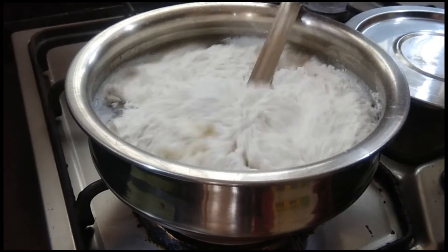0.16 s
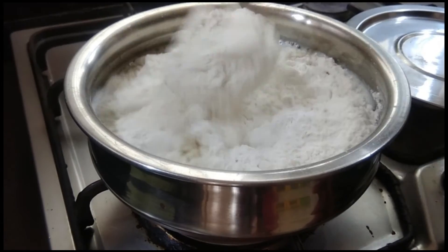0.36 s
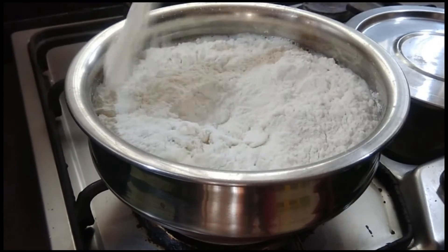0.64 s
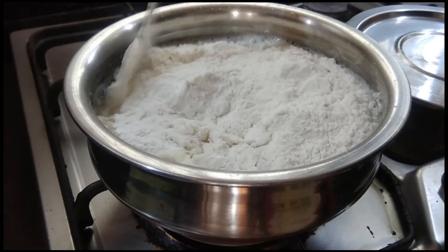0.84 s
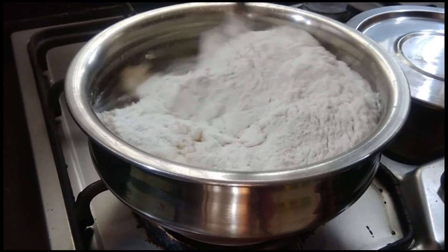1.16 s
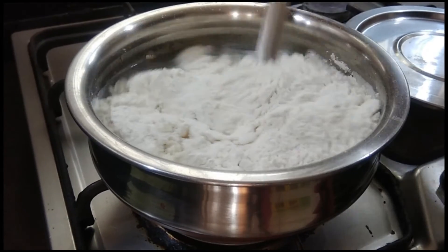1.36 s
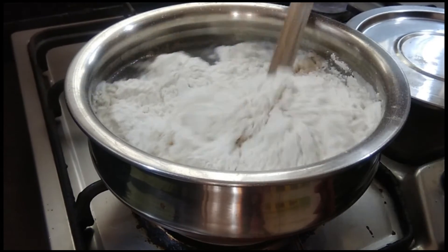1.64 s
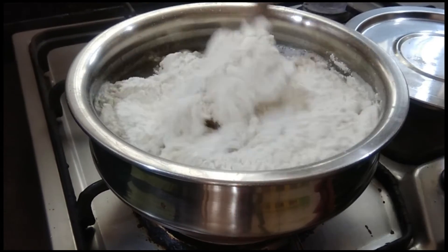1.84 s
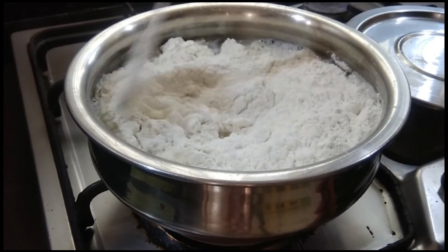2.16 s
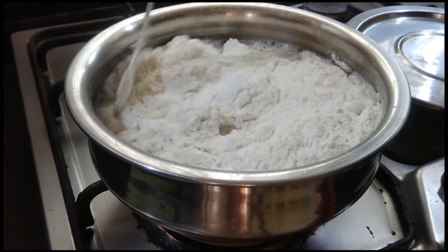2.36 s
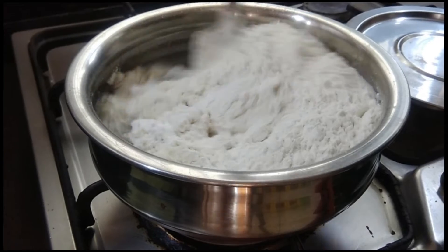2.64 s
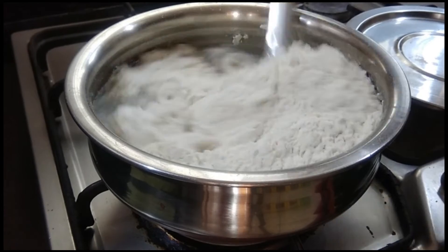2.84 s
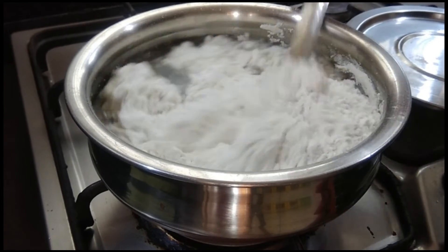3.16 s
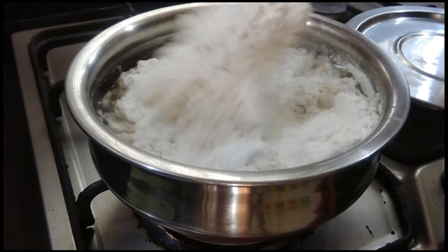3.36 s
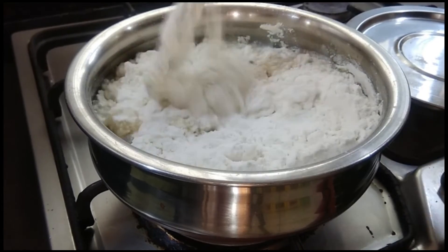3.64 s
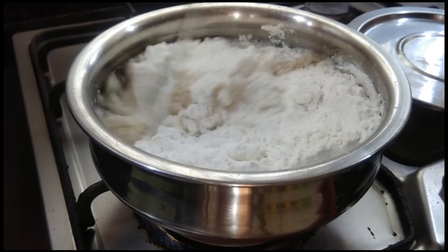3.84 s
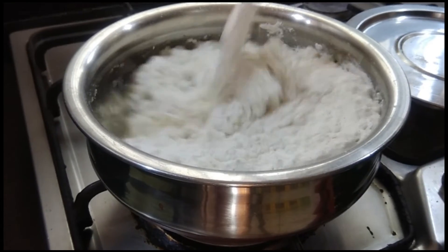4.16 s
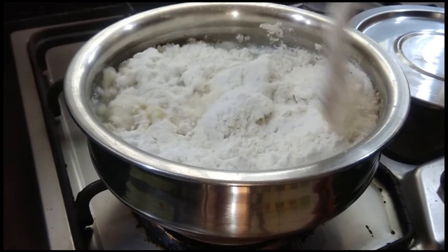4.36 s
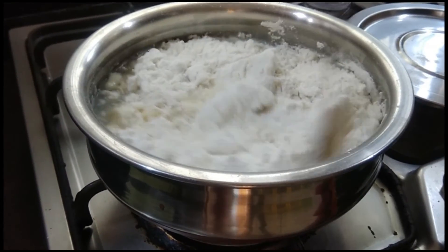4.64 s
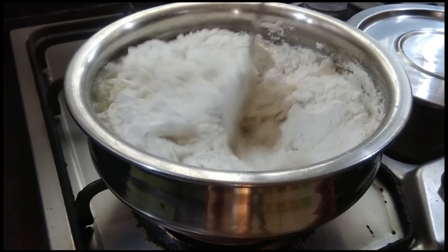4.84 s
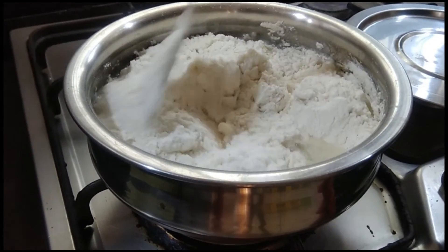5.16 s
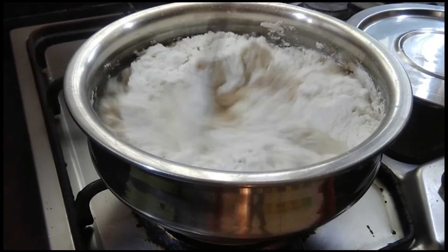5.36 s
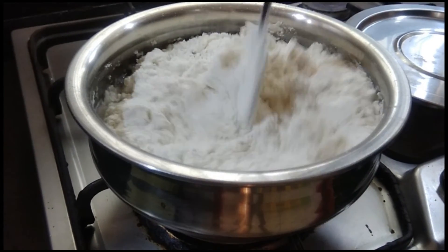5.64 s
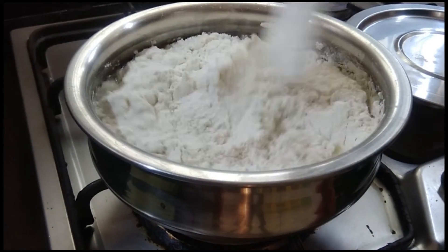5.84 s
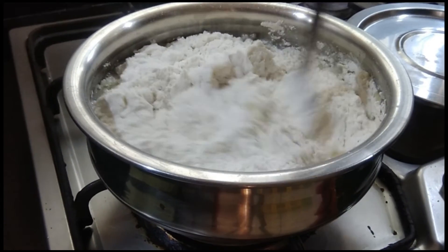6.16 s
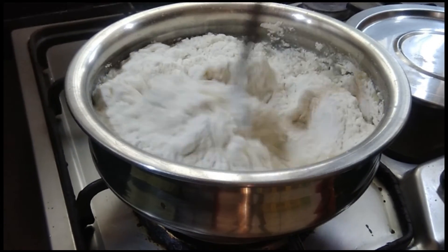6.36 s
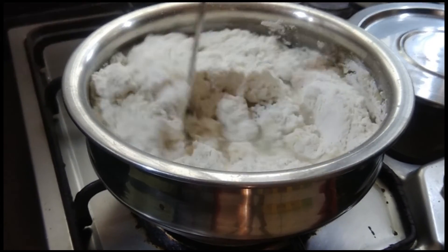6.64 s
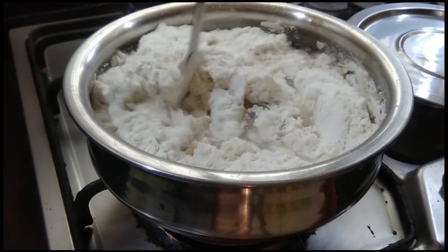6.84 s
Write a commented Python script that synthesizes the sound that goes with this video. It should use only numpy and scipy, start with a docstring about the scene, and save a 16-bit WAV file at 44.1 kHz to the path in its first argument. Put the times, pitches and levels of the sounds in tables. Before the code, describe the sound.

Close microphone in a quiet kitchen. A steel spatula scrapes wet flour around a pot in uneven gritty hisses, its edge singing faintly on the metal. Dull, dough-muffled knocks land at about 0.9, 2.3, 4.6 and 6.1 seconds, with crushed lumps spurting hiss and small bright ticks on the wall. Beneath run a soft burner rush, hollow simmer, little bubbles and a very thin high whine.

```python
"""Quiet kitchen, steel pot on a stove, microphone close: burner rush, simmer and a thin whine throughout.
From the start a steel spatula drags gritty hiss through wet flour (filtered grains and noise) and its
edge sings on steel (narrow noise); bubbles (rising tones), steam gurgles and hollow spatula notes (noise
swells) join. Then come knocks on the pot, muffled by dough (push, ring and slap), and lumps crushed in
spurts of hiss; last to enter are blade ticks on the wall (click and high ring). A short room tail follows."""
import sys
import numpy as np
from scipy import signal
from scipy.fft import rfft, irfft, next_fast_len
from scipy.io import wavfile
from scipy.ndimage import uniform_filter1d

SR = 44100
rng = np.random.default_rng(int(sys.argv[2]) if len(sys.argv) > 2 else 0)


def dump(signal):
    """Clip the signal to [-1, 1] and save it as 16-bit WAV at the path in sys.argv[1]."""
    limited = np.clip(np.atleast_2d(signal).T, -1, 1)
    pcm = np.round(limited * 32767).astype(np.int16)
    wavfile.write(sys.argv[1], SR, pcm)


N = 308435
TIME = np.arange(N) / SR
CUT_HZ = 15800  # top of the recorder's band


def amp(db):
    """Amplitude from dB."""
    return 10 ** (np.asarray(db) / 20)


def unit(x):
    """Scales to rms 1."""
    return x / np.sqrt(np.mean(x ** 2) + 1e-20)


def read(points, hz):
    """A table's value on a log-frequency axis."""
    f, value = np.transpose(points)
    return np.interp(np.log(hz + 1), np.log(f + 1), value)


def add(mix, s, sound):
    """Mixes a sound in at time s."""
    part = mix[:, max(round(s * SR), 0):][:, :sound.shape[-1]]
    part += sound[..., :part.shape[1]]


def colour(x, gain):
    """Filters by a gain given as a function of Hz."""
    size = next_fast_len(x.shape[-1])
    return irfft(rfft(x, size) * gain(np.fft.rfftfreq(size, 1 / SR)), size)[..., :x.shape[-1]]


# how alike the two microphone ports hear noise: [f/Hz, left-right likeness 0-1]
LIKENESS = [(200, 0.97), (600, 0.38), (1500, 0.044), (10000, 0.039)]


def noise(size):
    """White noise at two microphone ports, alike in the bass."""
    def alike(f):
        return np.clip(read(LIKENESS, f), 0, 1)

    shared = colour(rng.standard_normal(size), lambda f: np.sqrt(alike(f)))
    separate = colour(rng.standard_normal((2, size)), lambda f: np.sqrt(1 - alike(f)))
    return shared + separate


def peak(f, hz, width):
    """Gain of a resonance, halved at half its width to either side."""
    return 1 / (1 + (2 * (f - hz) / width) ** 2)


def swell(t, length):
    """Rises to 1 in a quarter of its length, then dies away."""
    u = 4 * t / length
    return u * np.exp(1 - u)


def patches(shape, order, size):
    """A random field, smooth over order bins and size frames."""
    across = uniform_filter1d(rng.standard_normal(shape), order, axis=0)
    return unit(uniform_filter1d(across, size, axis=1))


# spectrum of the stove and kitchen: [f/Hz, relative level/dB per Hz]
FLOOR_SPECTRUM = [(25, -49), (70, -30), (130, -8.5), (219, -15), (414, -16.5), (554, -16.5), (1510, -25),
                  (2860, -29.5), (6000, -34), (8240, -31), (14000, -29)]


def stove(rush_db=-73.5, simmer_db=-81, hollow_db=-82, surge_db=6, whine_db=-68, whine_hz=15146):
    """The burner's soft rush, the pot's hollow simmer that comes and goes, and a thin steady whine."""
    rush = amp(rush_db) * unit(colour(noise(N), lambda f: amp(read(FLOOR_SPECTRUM, f))))
    simmer = 0
    for hz, db in ((224, simmer_db), (553, hollow_db)):
        surge = rng.uniform(-1, 1, size=60)
        surge = np.interp(TIME, np.linspace(0, TIME[-1], len(surge)), surge)
        band = unit(colour(noise(N), lambda f: peak(f, hz, 20.44)))
        simmer += amp(db + surge_db * surge) * band
    # a narrow core with a weaker skirt
    whine = colour(noise(N), lambda f: peak(f, whine_hz, 10) + .15 * peak(f, whine_hz, 300))
    return rush + simmer + amp(whine_db) * unit(whine)


def grit(per_s, share):
    """Countless tiny slips: separate random grains, by their share of the power, among smooth noise."""
    struck = rng.random(N) < per_s / SR
    grains = struck * (rng.standard_normal(N) * .5 + rng.standard_normal((2, N)))
    return np.sqrt(share) * unit(grains) + np.sqrt(1 - share) * noise(N)


def pressure(t, rise, hold, fade):
    """Gain of one push, t seconds after it starts: builds, eases off while held, lifts away."""
    build_db = 8.5 + 40.5 * rise  # the longer the rise, the deeper it starts
    build = build_db * np.clip(1 - t / rise, 0, 1)
    ease = 39.5 * np.clip(t - rise, 0, hold)  # dB per s
    lift = np.clip(1 - (t - rise - hold) / fade, 0, 1) ** 2
    touch = np.clip(t / (0.014 * rise), 0, 1)  # the blade makes contact early in the rise
    return touch * amp(-build - ease) * lift


def low_edge(t, low_hz=400, hz_per_db=47, hz_per_s=2780, top_hz=1690):
    """Lowest Hz of the rasp: a hard knock sets the blade on the floor, then the edge climbs as it leaves."""
    edges = []
    for s, *_, clack_db in KNOCK_EVENTS:
        climb = low_hz - hz_per_db * clack_db + hz_per_s * (t - s)
        edges.append(np.where(t > s - .005, climb, np.inf))
    return np.minimum(np.min(edges, axis=0), top_hz)


# spectrum of wet flour on steel: [f/Hz, relative level/dB per Hz]
HISS_SPECTRUM = [(1450, -13), (1850, -5), (2190, -9), (2440, -10), (3350, -16), (4300, -3.5), (6830, -2),
                 (7610, 1), (12100, 3.5), (14300, -1.5), (16000, -3.5)]
# pushes of the blade through the flour, levels before the trims below:
# [t/s, rise/s, hold/s, fade/s, fine hiss level/dB, rustle level/dB and low rasp level/dB relative
# to the hiss, brightness of the hiss/dB per octave]
PUSH_EVENTS = [(0.0, 0.0012, 0.0024, 0.062, -31, -13, -12.5, -1),
               (0.02, 0.012, 0.034, 0.26, -48, -14, -9, 3),
               (0.205, 0.03, 0.42, 0.5, -48.5, -16.5, -21, 7.5),
               (0.864, 0.14, 0.15, 0.33, -27.5, -7.5, -10, -0.5),
               (1.262, 0.11, 0.09, 0.15, -37.5, -8, -18, -0.5),
               (1.815, 0.089, 0.046, 0.15, -55.5, -4.5, -39, 7.5),
               (2.324, 0.004, 0.042, 0.075, -44.5, -10, -4, -14),
               (2.374, 0.041, 0.15, 0.15, -32.5, -8.5, -10.5, -6),
               (2.48, 0.13, 0.14, 0.38, -31, -9.5, -18, -1),
               (2.78, 0.089, 0.11, 0.048, -39.5, -6.5, -29.5, 0),
               (4.263, 0.063, 0.024, 0.089, -45, -23, -35, 13),
               (4.6, 0.0042, 0.012, 0.03, -33.5, -4.5, -7.5, -13),
               (4.692, .13, 0.042, 0.093, -43.5, -9.5, -22, 5),
               (5.38, 0.076, 0.022, 0.028, -41, -7.5, -12.5, -10.5),
               (6.077, 0.071, 0.24, 0.11, -36, -2, -2.5, -6.5),
               (6.578, 0.29, 0.1, .1, -37.5, -10, -10.5, -2.5)]


def strokes(fine_db=-3.5, rustle_db=-7.0, rasp_db=-5.0, patchy_db=3.5, judder_db=1.0, quiet_below_db=-34,
            ripple_db=3.0, quiet_ripple_db=7.0):
    """Wet flour dragged over hot steel: a fine hiss above a rustle and a low rasp."""
    f, t, z = signal.stft(grit(per_s=5000, share=0.4), SR, nperseg=512, noverlap=432)
    upper = 1 / (1 + (6900 / (f + 1)) ** 20)
    lower = 1 / (1 + (f / 3500) ** 10)
    bands = (upper * (f < CUT_HZ), (1 - upper) * (1 - lower), lower)
    fine, rustle, rasp = (unit(amp(read(HISS_SPECTRUM, f)) * band)[:, None] for band in bands)
    octaves = np.log2((f[:, None] + 1) / 11000)  # brightness pivots on 11 kHz
    power, force = 0, 0
    for s, rise, hold, fade, db, middle_db, low_db, bright_db in PUSH_EVENTS:
        push = amp(db) * pressure(t - s, rise, hold, fade)
        timbre = amp(fine_db) * unit(fine * amp(bright_db * octaves))
        timbre = timbre + amp(rustle_db + middle_db) * rustle + amp(rasp_db + low_db) * rasp
        power += push ** 2 * timbre ** 2
        force += push
    field = np.sqrt(power / (1 + low_edge(t) ** 10 / (f[:, None] + 1) ** 10))
    # random narrow ripple over the hiss, drifting with time,
    # deeper where the hiss is quiet and in its lower bands
    quiet = np.clip((quiet_below_db - 20 * np.log10(force + 1e-9)) / 10, 0, 1)
    deepening = np.maximum(quiet, 1 - upper[:, None])
    depth_db = ripple_db + (quiet_ripple_db - ripple_db) * deepening
    ripple = amp(depth_db * np.minimum(patches(field.shape, order=2, size=90), 1))
    ripple /= np.sqrt(np.mean(ripple ** 2, axis=0))
    judder = unit(uniform_filter1d(rng.standard_normal(len(t)), size=7))
    patchy = patches(field.shape, order=2, size=16)
    z = z * field * ripple * amp(patchy_db * patchy + judder_db * judder)
    sound = signal.istft(z, SR, nperseg=512, noverlap=432)[1][:, :N]
    return sound * amp([[-.6], [.6]])  # slightly to the right


# the blade's edge slides lightly on steel, each on one resonance:
# [t/s, length before release/s, f/Hz, width before bending/Hz, level before the envelope/dB]
SLIDE_EVENTS = [(0.0, 0.43, 4000, 380, -66.5), (0.0, 0.32, 3040, 900, -70), (0.392, 0.26, 1790, 128, -76.5),
                (1.848, 0.13, 6940, 1200, -60), (2.226, .06, 9260, 110, -70), (3.214, 0.14, 8050, 111, -72),
                (3.28, 0.56, 2805, 100, -70.5), (3.311, .51, 3790, 220, -74.5),
                (5.644, .1, 9370, 450, -56.5), (5.628, 0.41, 4064, 179, -70.5),
                (5.716, 0.314, 2880, 317, -70.5), (5.784, 0.3, 2266, 112, -69.5),
                (6.517, .11, 1760, 110, -67.5)]


def slides(attack_share=0.32, release_t60=0.21, waver_db=3.0, flutter_db=2.2, bend_share=0.012,
           scuff_db=-11):
    """A light rub keeps a blade resonance singing; it bends and wavers as the contact point travels."""
    out, t = np.zeros((2, N)), np.arange(SR * 3 // 4) / SR
    for s, length, hz, width, db in SLIDE_EVENTS:
        bend, waver = patches((2, len(t)), order=1, size=2400)
        flutter = patches((1, len(t)), order=1, size=350)
        rub = noise(len(t))
        line = signal.hilbert(colour(rub, lambda f: peak(f, hz, width)))
        bend_phase = 2 * np.pi * np.cumsum(bend_share * hz * bend) / SR
        line = unit((line * np.exp(1j * bend_phase)).real)
        scuff = amp(scuff_db) * unit(colour(rub, lambda f: peak(f, hz, hz / 2) ** 2))
        attack = np.minimum(t / (attack_share * length), 1)
        release = amp(-60 * np.maximum(t - length, 0) / release_t60)
        song = unit((line + scuff) * amp(waver_db * waver + flutter_db * flutter))
        add(out, s, amp(db) * song * attack * release)
    return out


def blips(per_s=6.2, top_db=-70, range_db=11, low_hz=210, high_hz=600, length=0.0634, glide=0.1):
    """Small bubbles break through the paste at random, each rising a little in pitch."""
    out, t = np.zeros((2, N)), np.arange(SR // 4) / SR
    for when, pitch, size in rng.random((int(per_s * N / SR), 3)):
        hz = low_hz * (high_hz / low_hz) ** (pitch ** 2) * (1 + glide * t / length)
        tone = np.sin(2 * np.pi * np.cumsum(hz) / SR)
        add(out, when * N / SR, amp(top_db + range_db * (size - 1)) * swell(t, length) * tone)
    return out


# steam gurgles, and hollow notes of the spatula near 800 Hz: [t/s, f/Hz, level/dB, length/s]
LOW_SWELL_EVENTS = [(0.334, 560, -63.5, 0.18), (0.45, 578, -60, 0.11), (0.921, 805, -48.5, 0.14),
                    (1.824, 282, -68.5, 0.1), (2.403, 794, -43, 0.17), (2.516, 1480, -49, 0.071),
                    (3.215, 553, -64.5, 0.067), (3.795, 563, -65.5, 0.068), (4.278, 227, -67.5, 0.16),
                    (4.435, 566, -66, 0.1), (4.656, 259, -48.5, 0.097), (4.724, 581, -55, 0.05),
                    (5.484, 233, -63, 0.12), (6.149, 239, -57.5, 0.13), (6.203, 320, -55, 0.063),
                    (6.451, 226, -65, 0.084), (6.621, 231, -63, 0.093), (6.699, 265, -60, 0.097)]


def low_swells(width_share=0.12):
    """Short low swells of noise: steam gurgles, and hollow notes of the spatula near 800 Hz."""
    out, t = np.zeros((2, N)), np.arange(SR // 2) / SR
    for s, hz, db, length in LOW_SWELL_EVENTS:
        note = colour(noise(len(t)), lambda f: peak(f, hz, width_share * hz)) * swell(t, length)
        add(out, s, amp(db) * note / note[:, :int(length * SR / 2)].std())
    return out


# blade on the pot's floor: [t/s, thud f/Hz, thud level/dB, middle f/Hz,
# middle level/dB and clack level/dB relative to the thud]
KNOCK_EVENTS = [(0.866, 384, -36.5, 915, -2, 1.5), (2.327, 377, -41, 750, -1, 0),
                (4.6, 325, -30, 590, -4, -9.5), (4.619, 242, -39, 600, -7, -13),
                (5.345, 248, -46, 640, -37, -32), (6.078, 316, -29.5, 750, -11, -11.5),
                (6.135, 272, -42, 805, -25, -24)]
# modes of the dough-damped pot: [f/Hz, relative level/dB, t60/s]
POT_MODES = [(240, -1.5, 0.25), (282.5, -1.5, 0.27), (335, -4.5, 0.4), (416.2, 1.5, 0.24), (603, 1.5, 0.2),
             (790, -5, 0.35), (948, -3.5, 0.23), (1150, 2.5, 0.22), (1273, -0.5, 0.26)]


def knocks(push_db=19, smack_db=19.02, smack_t60=0.036, slap_db=13.02, slap_t60=0.42):
    """A dead push, a wet smack and the pot's ring; harder contact brings out the upper bands."""
    out, t = np.zeros((2, N)), np.arange(SR // 2) / SR
    for s, hz, db, middle_hz, middle_db, clack_db in KNOCK_EVENTS:
        window = np.sin(np.pi * np.minimum(t / 0.0053, 1)) ** 2  # a push of 5.3 ms
        push = amp(push_db) * np.sin(2 * np.pi * hz * t) * window
        ring = 0
        for mode, level, t60 in POT_MODES:
            ring += amp(level - 60 * t / t60) * np.sin(2 * np.pi * (mode * t + rng.random()))
        slap = noise(len(t)) * (amp(smack_db - 60 * t / smack_t60) + amp(slap_db - 60 * t / slap_t60))
        blow = push + (ring + slap) * (1 - np.exp(-t / 0.000059))
        bands = (((0.66 * hz, 1.454 * hz), 0),
                 ((0.82 * middle_hz, 1.15 * middle_hz), middle_db),
                 ((1000, 2400), clack_db))
        for band, band_db in bands:
            sos = signal.butter(2, band, "bandpass", fs=SR, output="sos")
            part = signal.sosfilt(sos, blow)
            add(out, s, amp(db + band_db) * part / part[:, :SR // 80].std())  # level of the first 12.5 ms
    return out


# lumps crushed under the blade: [t/s, level/dB, length/s]
CRUNCH_EVENTS = [(1.121, -27.5, 0.0085), (2.375, -35.5, 0.025), (2.571, -29, 0.015), (4.313, -52.5, 0.013),
                 (4.469, -42, 0.014), (4.623, -36, 0.012), (4.651, -29, 0.026), (5.464, -35.5, 0.017),
                 (6.192, -35.5, 0.024), (6.271, -45.5, 0.0056)]


def crunches(low_hz=3000):
    """A lump gives way in a short spurt of hiss."""
    out, t = np.zeros((2, N)), np.arange(SR // 6) / SR
    for s, db, length in CRUNCH_EVENTS:
        spurt = colour(noise(len(t)),
                       lambda f: amp(read(HISS_SPECTRUM, f)) * f ** 2 / (f ** 2 + low_hz ** 2))
        add(out, s, amp(db) * unit(spurt) * swell(t, length))
    return out


# blade edge on the wall: [t/s, level/dB, left over right level/dB]
TICK_EVENTS = [(2.215, -50.5, -2.5), (3.784, -44, 4), (3.79, -41.5, 3), (5.207, -49, -1.5),
               (5.217, -43.5, 5.5)]
# resonances of the thin steel: [f/Hz, width/Hz, relative level/dB]
STEEL_MODES = [(9400, 510, 7), (11900, 960, -5), (14440, 2800, 1)]


def ticks(ring_t60=0.099, ring_db=-11, click_t60=0.058):
    """Thin steel touches steel: a click and a short, high ring."""
    out, t = np.zeros((2, N)), np.arange(SR // 2) / SR

    def steel(f):
        return sum(amp(level) * peak(f, hz, width) for hz, width, level in STEEL_MODES)

    for s, db, pan_db in TICK_EVENTS:
        ring = unit(colour(noise(len(t)), steel))
        decay = amp(-60 * t / click_t60) + amp(ring_db - 60 * t / ring_t60)
        add(out, s, amp([[db + pan_db / 2], [db - pan_db / 2]]) * ring * decay)
    return out


# decay of the room: [f/Hz, t60/s]
KITCHEN_DECAY = [(600, 0.37), (3000, 0.26), (15000, 0.28)]


def kitchen(x):
    """A diffuse tail, each band dying at its own speed."""
    f, t, z = signal.stft(rng.standard_normal((2, SR // 2)), SR, nperseg=256)
    decay = amp(-60 * t / read(KITCHEN_DECAY, f)[:, None]) * (t > .005)
    tail = signal.istft(z * decay, SR, nperseg=256)[1]
    return signal.fftconvolve(x, tail / np.linalg.norm(tail[0]), axes=1)[:, :N]


def scene():
    """Strokes, knocks and small contacts with their room, over the low swells, bubbles and stove."""
    hiss, thuds = strokes(), knocks()
    small = crunches() + ticks() + slides()
    room = kitchen(amp(-6.5) * hiss + amp(-4.5) * small + amp(-14.5) * thuds)
    return hiss + thuds + small + low_swells() + blips() + room + stove()


def record(dry):
    """The recorder's band limit, a steep low-pass."""
    lowpass = signal.firwin(511, CUT_HZ, window=("kaiser", 9), fs=SR)
    return signal.oaconvolve(dry, lowpass[None], "same")


dry = scene()
out = record(dry)
dump(out)
```